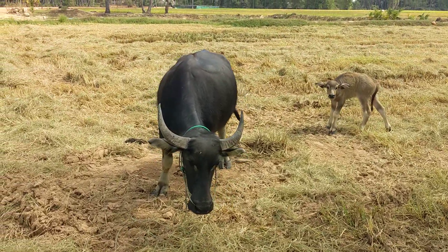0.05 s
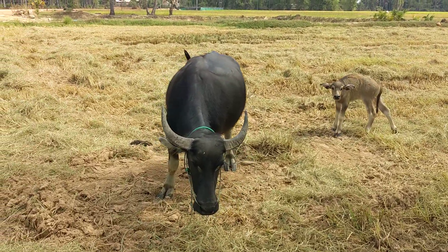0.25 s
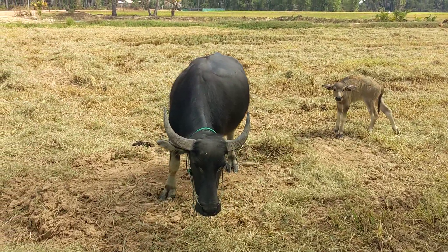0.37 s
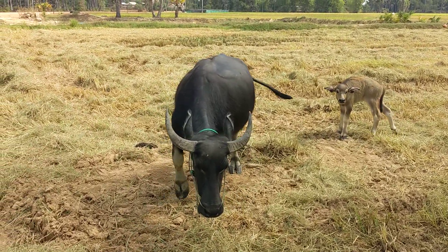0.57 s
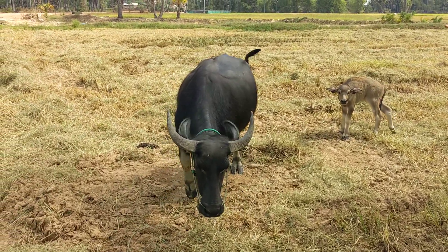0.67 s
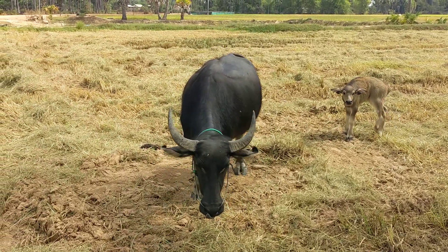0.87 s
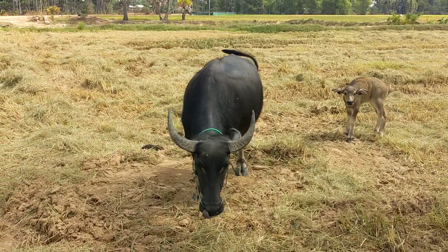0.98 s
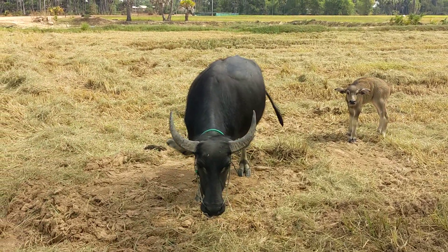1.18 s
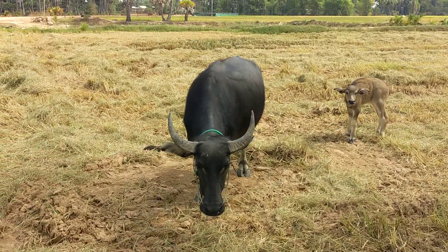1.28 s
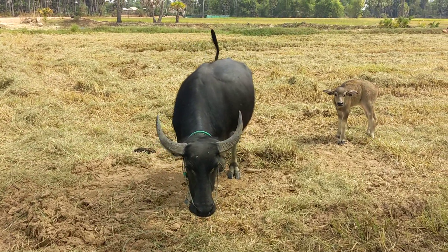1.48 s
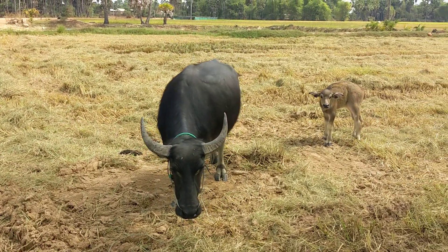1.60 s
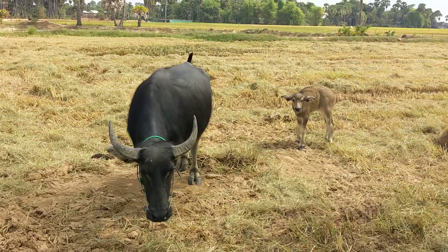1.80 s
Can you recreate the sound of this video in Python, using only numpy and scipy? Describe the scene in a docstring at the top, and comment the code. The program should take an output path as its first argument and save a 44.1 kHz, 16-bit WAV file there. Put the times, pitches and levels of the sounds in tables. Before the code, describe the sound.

A water buffalo close by gives one short nasal grunt that drops into a rasp. Then dry straw ticks and hooves land softly, while faint birds, an insect and a distant engine sound across the open field.

```python
"""In an open field a water buffalo close by gives one short nasal grunt.
Its vocal folds start as a hum that snaps on every second cycle, then drop in pitch and break into
a hard rasp that rings throat and nose. Far off an engine drones over faint air noise,
a call rings, birds chirp and an insect trills. Dry straw ticks, and hooves scuff and land softly."""
import sys
import numpy as np
from scipy import signal
from scipy.fft import rfft, irfft
from scipy.io import wavfile
from scipy.ndimage import uniform_filter1d

SR = 44100
rng = np.random.default_rng(int(sys.argv[2]) if len(sys.argv) > 2 else 0)


def put_to_file(sound):
    """Save the sound as 16-bit audio at rate SR, in the file named by the first command-line argument."""
    columns = np.atleast_2d(sound).T  # one column per channel
    safe = np.clip(columns, -1, 1)
    whole_steps = np.round(safe * 32767)
    wavfile.write(sys.argv[1], SR, whole_steps.astype(np.int16))


N = 81585
TIME = np.arange(N) / SR


def undb(db):
    """The decibel scale: 20 dB is a factor of ten in amplitude."""
    return 10 ** (np.asarray(db) / 20)


def curve(rows, column=1):
    """Linear interpolation of one column of a table over time."""
    rows = np.array(rows)
    return np.interp(TIME, rows[:, 0], rows[:, column])


def spectrum(points):
    """Interpolation of a table over logarithmic frequency."""
    hz, values = np.array(points).T
    return np.interp(np.log(np.fft.rfftfreq(2 * N, 1 / SR) + 1), np.log(hz), values)


def colour(x, db):
    """Minimum-phase filtering: folding the cepstrum gives a causal filter with these gains."""
    cepstrum = irfft(np.log(undb(db)))
    cepstrum[1:N] *= 2
    cepstrum[N + 1:] = 0
    return irfft(rfft(x, 2 * N) * np.exp(rfft(cepstrum)))[:N]


def noise(points):
    """Spectral shaping of white noise, scaled to rms 1."""
    x = colour(rng.standard_normal(N), spectrum(points))
    return x / x.std()


def wander(rate_hz):
    """Moving averages smooth noise into a random fluctuation with a spread of 1."""
    span = max(int(SR / rate_hz), 2)
    x = uniform_filter1d(uniform_filter1d(rng.standard_normal(N), span), span)
    return x / x.std()


def tone(hz):
    """A sine of rms 1 whose phase is the integral of its frequency."""
    return np.sqrt(2) * np.sin(2 * np.pi * np.cumsum(hz) / SR)


def pan(x, db):
    """Direction by level difference: left minus right, in dB."""
    return x * undb(np.array([[db], [-db]]) / 2)


def engine():
    """A periodic source: the two harmonics of a far engine swell and fade over a low rumble."""
    # Swell of the drone. Each row: time in seconds, level in dB.
    swell = [(0.0, -52.5), (0.23, -60), (0.334, -49.5), (0.68, -49.5), (0.76, -56.5), (0.968, -61),
             (1.132, -51), (1.22, -64), (1.7, -49.5), (1.85, -60)]
    # Harmonics. Each row: multiple of the fundamental, relative level in dB.
    harmonics = [(1, 1.5), (2, -10)]
    # Rumble spectrum. Each row: frequency in Hz, relative density in dB.
    rumble = [(20, -63), (36, -6), (55, -5), (110, 2), (160, -8), (230, -16), (400, -27.5), (600, -18.5),
              (900, -31), (2000, -46)]
    hz = 68.16 * (1 + 0.014 * wander(10.3))
    drone = sum(undb(db + 2 * wander(2.7)) * tone(order * hz) for order, db in harmonics)
    return pan(drone * undb(curve(swell)) + undb(-57) * noise(rumble), db=1.43)


def open_air():
    """Uncorrelated noise left and right sounds diffuse; a varying treble gain makes it rustle."""
    # Air spectrum on each side. Each row: frequency in Hz, relative density in dB.
    left = [(600, 1), (1600, 2.5), (4500, 2), (7000, -2.5), (10000, -9.5), (13500, -4.5), (16000, -10.5)]
    right = [(200, -25), (600, -5.5), (1500, -3.5), (4500, -1), (7000, -18.5), (10000, -38), (13000, -31),
             (15500, -18)]
    # Rustle. Each row: time in seconds, treble gain in dB.
    rustle = [(0, 3), (.88, 5), (1.02, 11.5), (1.1, 0.5), (1.3, -3.5), (1.45, 6), (1.53, -0.5), (1.76, 2),
              (1.83, 10.5)]
    air = np.array([undb(-61) * noise(left), undb(-60) * noise(right)]) * undb(1.1 * wander(1.3))
    treble = signal.sosfiltfilt(signal.butter(2, 9200, "high", fs=SR, output="sos"), air)
    return air + treble * (undb(curve(rustle)) - 1)


def field_hiss():
    """Random amplitude modulation makes a high hiss flicker, independently on each side."""
    # Hiss spectrum. Each row: frequency in Hz, relative density in dB.
    band = [(1200, -37), (1780, -20.5), (1920, -2), (2320, 4.5), (2450, 1.5), (2620, 3.5), (3250, -8.5),
            (3420, -4), (3600, -7), (4000, -7), (5000, -25), (7000, -34.5)]
    # Swell of the hiss. Each row: time in seconds, level in dB.
    swell = [(0, -57.5), (.2, -56.5), (.39, -54), (.46, -62.5), (.67, -51.5), (.98, -55), (1.06, -61),
             (1.1, -53), (1.2, -55.5), (1.29, -54.5), (1.47, -53.5), (1.73, -56), (1.79, -64), (1.85, -53)]
    hiss = np.array([noise(band) * undb(1.7 * wander(24.3)) for _ in range(2)])
    return pan(hiss * undb(curve(swell)), db=-6)


def far_call():
    """Random modulation of pitch and level roughens a far ringing note that ends under the grunt."""
    # Envelope. Each row: time in seconds, level in dB.
    envelope = [(0, -55.5), (.1, -57), (.19, -58.5), (.26, -54)]
    sounding = TIME < envelope[-1][0]
    note = tone(2703 * (1 + 0.049 * wander(533)))
    return pan(sounding * note * undb(curve(envelope) + 4.4 * wander(81)), db=-15)


def fold_closures(phase, snap_gain, push_gain):
    """Impulsive excitation: each closure gives a snap and a push; gentler ones are slower and duller."""
    # Spectra of the hard snap and the dull push. Each row: frequency in Hz, gain in dB.
    snap_colour = [(100, -19), (600, -12.5), (1100, 0), (1800, 0.5), (2400, 6.5), (3200, 8.5), (4000, 4.5),
                   (4680, 1), (4920, -21), (6300, -12.5), (10500, -54)]
    push_colour = [(100, -17), (300, -29), (520, 6.5), (740, 3), (850, 1), (1100, -1), (1500, 1),
                   (2500, -52)]
    register_break_s, weak_db, scatter_db = .2535, -40, .6
    cycles = np.arange(28)
    times = np.interp(cycles, phase, TIME)
    weak = (cycles % 2 == 1) & (times < register_break_s)  # period doubling
    uneven = undb(weak_db * weak + scatter_db * rng.standard_normal(len(cycles)))
    strength = uneven * np.interp(times, TIME, snap_gain)
    closing_s = np.clip(2.4e-5 / (strength + 1e-9), .5 / SR, 9e-5)
    pulses = np.exp(-.5 * np.minimum(abs(TIME - times[:, None]) / closing_s[:, None], 20) ** 2)
    pulses = -pulses / pulses.sum(axis=1, keepdims=True)
    snaps = colour(strength @ pulses, spectrum(snap_colour))
    pushes = colour((uneven * np.interp(times, TIME, push_gain)) @ pulses, spectrum(push_colour))
    return snaps + pushes


def grunt_filter(source):
    """Resonances give the grunt its nasal peaks; a microphone notch near 5.7 kHz dulls its treble."""
    # Peaks and notches. Each row: centre in Hz, width in Hz, gain in dB.
    bands = [(703, 58, 5), (1440, 140, 7.5), (1520, 160, -17), (1744, 55, 5), (1930, 330, 7),
             (2430, 59, 5.5), (2570, 54, 1), (2746, 75, 9.5), (3315, 144, 12.5), (4260, 48, 9),
             (5690, 1050, -30), (7140, 2700, -21)]
    hz = np.fft.rfftfreq(2 * N, 1 / SR)
    response_db = sum(10 * np.log10(1 + (undb(db) ** 2 - 1) / (1 + (2 * (hz - centre) / width) ** 2))
                      for centre, width, db in bands)
    return colour(source, response_db)


def buffalo():
    """Source and filter: the folds hum, while their closures and puffs of air ring throat and nose."""
    # Vibration of the folds. Each row: time in seconds, pitch in Hz.
    pitch = [(.211, 283), (.222, 308), (.235, 289.3), (.25, 289), (.2535, 247.3), (.26, 252.2),
             (.2705, 211), (.275, 175.8), (.282, 167.5), (.312, 132.3), (.3225, 137), (.35, 65)]
    # Vocal effort. Each row: time in seconds, then gains of hum, push and snap in dB.
    effort = [(.206, -32.5, -14, -18), (.211, -35.5, 3, -7), (.223, -25.5, -1, -7.5),
              (.231, -27, 4.5, -3.5), (.258, -26.5, 3, -5), (.267, -26.5, 3, 1.5), (.278, -23, 3, 6),
              (.289, -31, -1, 3.5), (.312, -34, 0, 3), (.32, -34.5, 0.5, -4), (.328, -36.5, -3.5, -1),
              (.335, -48, -24, -21.5), (.346, -46, -11, -9.5), (.358, -69, -32, -41)]
    # Body of the hum. Each row: frequency in Hz, gain in dB.
    chest = [(80, 2), (135, -8), (175, -10.5), (240, 2), (295, 7), (345, -8.5), (430, -23.5), (570, -18),
             (720, -20), (850, -22.5), (1150, -44)]
    # Air through the nostrils. Each row: frequency in Hz, relative density in dB.
    nostrils = [(500, -11.5), (1500, 2.5), (3300, -5), (5000, -0.5), (7500, -10.5), (10500, -31),
                (15000, -44)]
    # Level difference of the rasp. Each row: frequency in Hz, left minus right in dB.
    left_gain = [(300, 5), (700, -4), (1300, -2.5), (1800, -13.5), (3200, -9.5), (3800, -18), (4400, -1.5),
                 (5500, 3.5), (15000, 15.5)]
    # Phase between the microphone ports. Each row: frequency in Hz, lead of the left in radians.
    left_lead = [(1500, 0.29), (2400, 1.05), (4100, 3), (5000, 4.32)]
    first_snap_s, fade_s, puff_decay_cycles = .2106, 0.0015, 0.78
    hz = curve(pitch)
    phase = np.cumsum(hz) / SR  # in cycles
    phase -= np.interp(first_snap_s, TIME, phase)
    voiced = np.clip(np.minimum(TIME - effort[0][0], effort[-1][0] - TIME) / fade_s, 0, 1)
    hum_gain, push_gain, snap_gain = (voiced * undb(curve(effort, column)) for column in (1, 2, 3))
    chest_hz, chest_db = np.array(chest).T
    hum = sum(-np.cos(2 * np.pi * k * phase) * undb(np.interp(k * hz, chest_hz, chest_db))
              for k in range(1, 7))
    closures = fold_closures(phase, snap_gain, push_gain)
    puffs = undb(-38) * snap_gain * np.exp(-(phase % 1) / puff_decay_cycles) * noise(nostrils)
    right = grunt_filter(closures + puffs)
    right_to_left = undb(spectrum(left_gain)) * np.exp(1j * spectrum(left_lead))
    left = irfft(rfft(right, 2 * N) * right_to_left)[:N]
    return pan(hum_gain * hum, db=1) + np.array([left, right])


def bird_whistles():
    """Frequency modulation: a bird's pitch follows a parabolic arch, blurred by fast jitter."""
    # Each row: start in seconds, length in seconds, top pitch in Hz, level in dB.
    whistles = [(0.505, 0.05, 4650, -67), (1.055, 0.052, 4800, -65)]
    out = np.zeros(N)
    for start, length, top_hz, db in whistles:
        progress = np.clip((TIME - start) / length, 0, 1)
        hz = top_hz * (1 - 0.083 * (2 * progress - 1) ** 2)
        out += undb(db) * np.sin(np.pi * progress) * tone(hz * (1 + .085 * wander(830)))
    return out


def scuffs():
    """Friction on dry ground: brief swells of band-limited noise as the animals shift their weight."""
    # Each row: peak time in seconds, Gaussian width in seconds, band centre in Hz, level in dB.
    swells = [(0.552, 0.021, 234, -59.5), (1.083, 0.027, 636, -63.5), (1.2, 0.043, 614, -68.5),
              (1.606, 0.0086, 332, -69.5)]
    hz, relative_width = np.fft.rfftfreq(N, 1 / SR), .26
    out = np.zeros(N)
    for peak, width, centre, db in swells:
        band = np.exp(-.5 * ((hz / centre - 1) / relative_width) ** 2)
        rub = irfft(rfft(rng.standard_normal(N)) * band, N)
        out += undb(db) * rub / rub.std() * np.exp(-.5 * ((TIME - peak) / width) ** 2)
    return out


def impacts(hits, surface, decay_s):
    """Damped impacts: exponentially decaying noise bursts, coloured by what is trodden on."""
    envelope = sum(undb(db) * (TIME >= at) * np.exp(-abs(TIME - at) / decay_s) for at, db in hits)
    response_db = spectrum(surface)
    rms_gain = np.sqrt(np.mean(undb(response_db) ** 2))
    return colour(rng.standard_normal(N) * envelope, response_db) / rms_gain


def straw_ticks():
    """Broadband transients: dry straw ticks brightly underfoot."""
    # Each row: start in seconds, level in dB.
    ticks = [(.574, -46.5), (.637, -49)]
    # Response of the straw. Each row: frequency in Hz, relative gain in dB.
    straw = [(4500, 2.5), (8000, -5), (15000, -12)]
    return pan(impacts(ticks, straw, decay_s=0.002), db=8.5)


def hoof_falls():
    """Soft impacts carry mostly low frequencies, so a hoof lands with a dull knock."""
    # Each row: start in seconds, level in dB.
    falls = [(.6732, -37), (1.159, -49.5)]
    # Response of hoof and ground. Each row: frequency in Hz, relative gain in dB.
    ground = [(80, -0.5), (200, 8.5), (370, -6), (560, 0), (1300, -5.5), (1800, -21), (6000, -33)]
    return impacts(falls, ground, decay_s=.0025)


def insect():
    """Shared frequency modulation, slow and fast, makes two high partials a wavering, rough trill."""
    # Envelope. Each row: time in seconds, level in dB.
    envelope = [(.7, -79), (.94, -76.5), (1.05, -75), (1.25, -83), (1.42, -73.5), (1.68, -74), (1.78, -84)]
    sounding = TIME > envelope[0][0]
    waver = 1 + 0.0054 * wander(15.3) + .013 * wander(970)
    trill = tone(5940 * waver) + undb(-8.5) * tone(7000 * waver)
    return pan(sounding * trill * undb(curve(envelope)), db=10.5)


def bird_peeps():
    """Tone bursts: far birds peep on slightly jittering pitches under Gaussian envelopes."""
    # Each row: peak time in seconds, pitch in Hz, level in dB.
    peeps = [(0.962, 2630, -53), (1.108, 2664, -55.5), (1.27, 2620, -54.5), (1.4, 2080, -57),
             (1.515, 3550, -63), (1.57, 3400, -60), (1.605, 2360, -54), (1.714, 2370, -54)]
    width_s = 0.013
    out = np.zeros(N)
    for peak, hz, db in peeps:
        envelope = np.exp(-.5 * ((TIME - peak) / width_s) ** 2)
        out += undb(db) * envelope * tone(hz * (1 + .018 * wander(384)))
    return pan(out, db=-6)


def bird_chirps():
    """A linear frequency sweep: each distant chirp falls, split into two notes by its envelope."""
    # Each row: start in seconds, level in dB.
    chirps = [(1.183, -66), (1.481, -65.5), (1.772, -61)]
    length_s, from_hz, to_hz = 0.092, 4600, 2720
    blur = 1 + .024 * wander(760)
    out = np.zeros(N)
    for start, db in chirps:
        progress = np.clip((TIME - start) / length_s, 0, 1)
        hz = from_hz + progress * (to_hz - from_hz)
        out += undb(db) * abs(np.sin(2 * np.pi * progress)) * tone(blur * hz)
    return out


def scene():
    """Superposition: the grunt, the steps and the field around them add as pressures."""
    nearby = buffalo() + straw_ticks() + hoof_falls() + scuffs()
    background = engine() + open_air() + field_hiss() + far_call()
    return nearby + background + bird_chirps() + bird_whistles() + bird_peeps() + insect()


def record(dry):
    """Band limiting: a steep elliptic low-pass filter removes the highest treble."""
    cutoff_hz = 15750
    return signal.sosfilt(signal.ellip(10, .1, 80, cutoff_hz, fs=SR, output="sos"), dry)


dry = scene()
out = record(dry)
put_to_file(out)
```